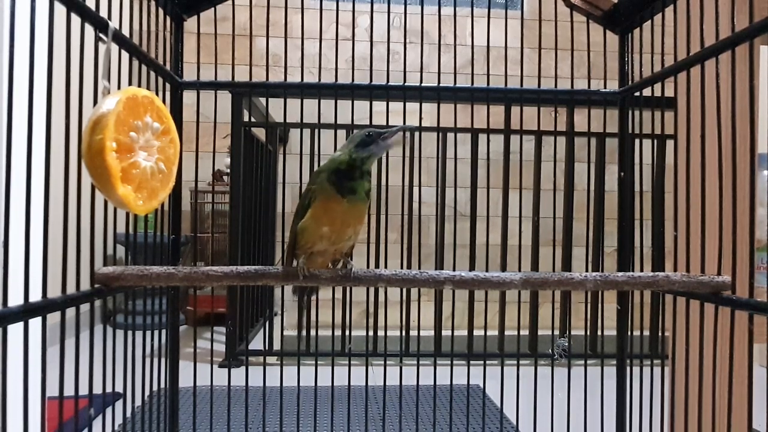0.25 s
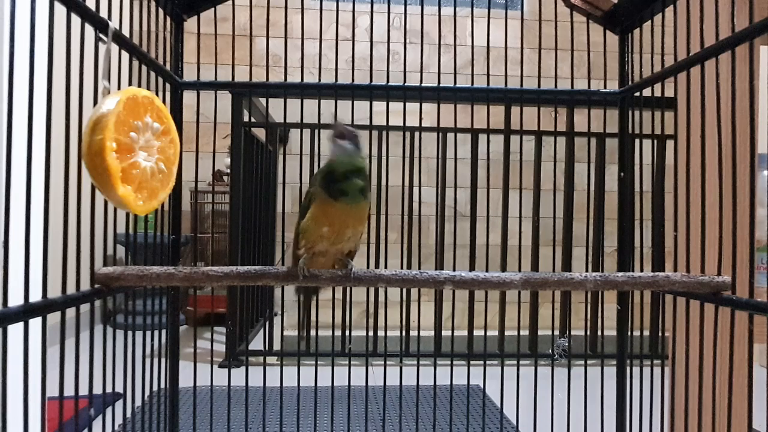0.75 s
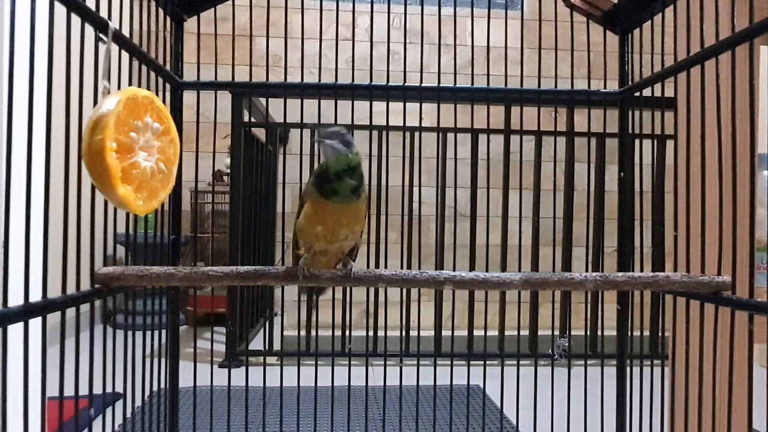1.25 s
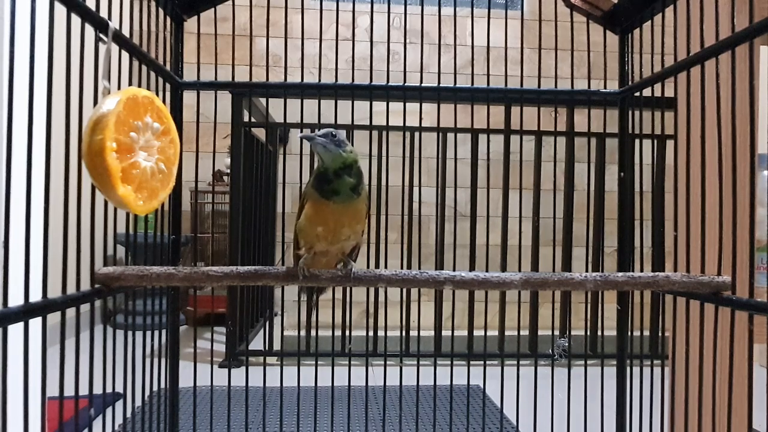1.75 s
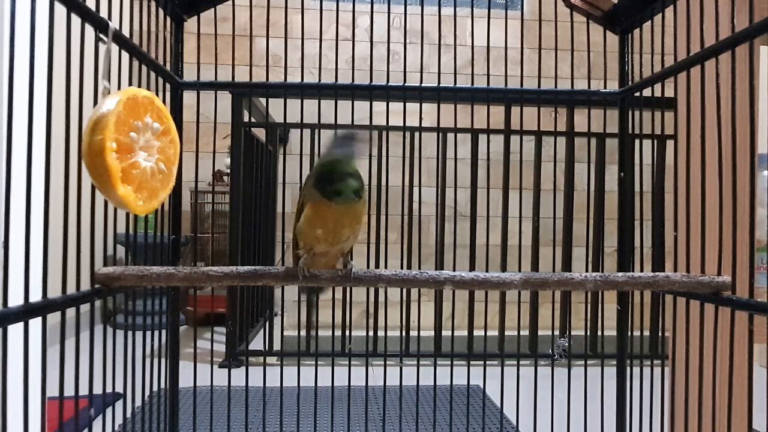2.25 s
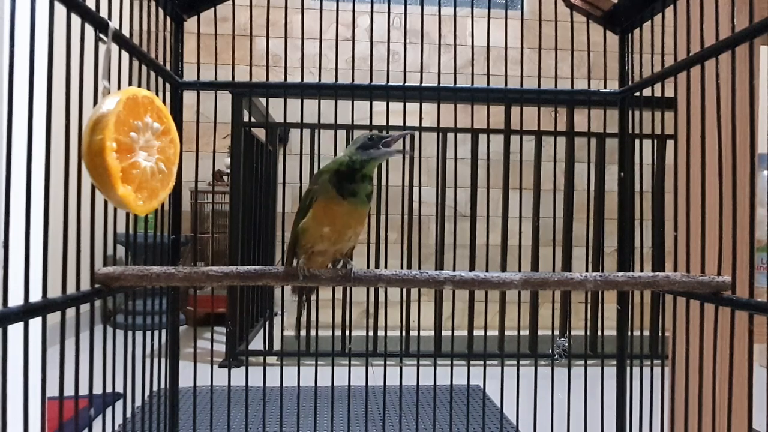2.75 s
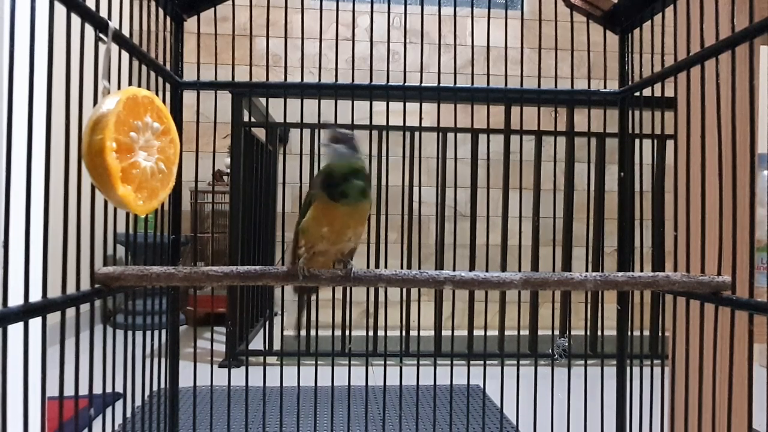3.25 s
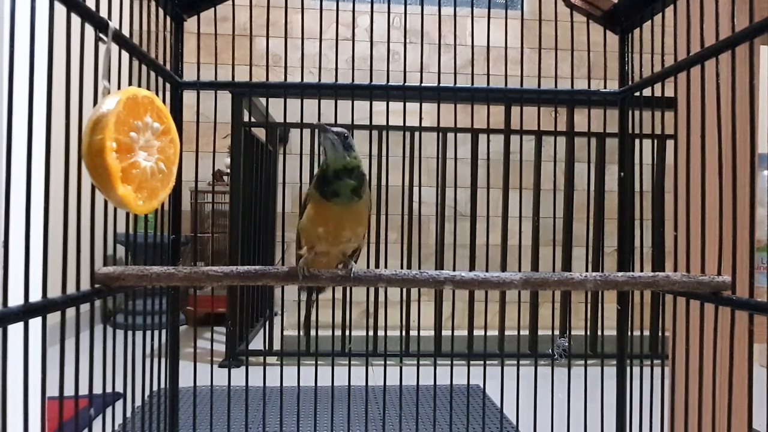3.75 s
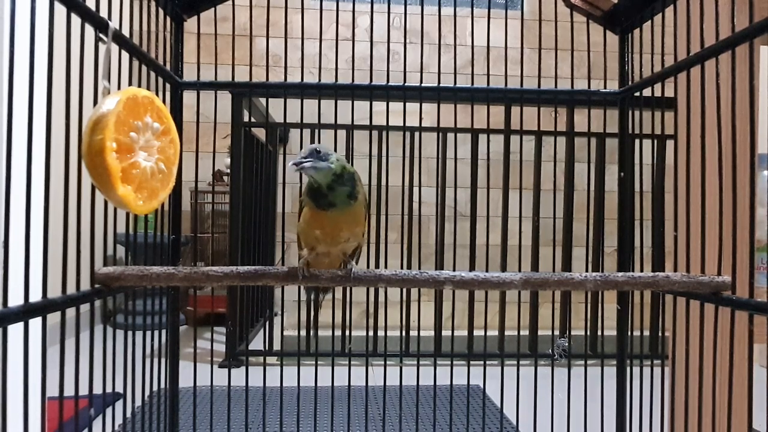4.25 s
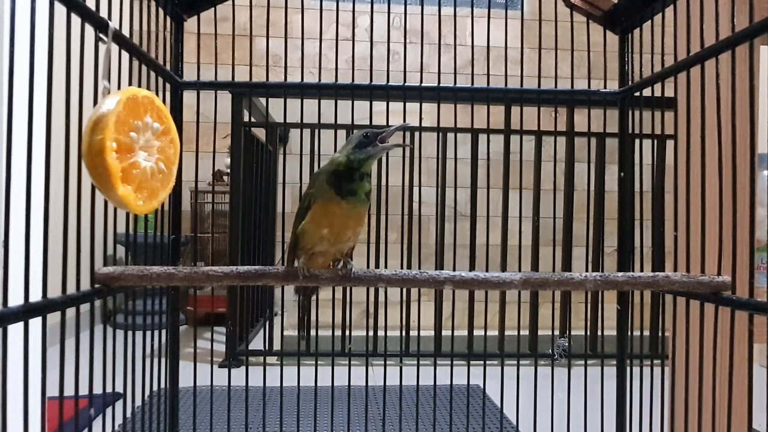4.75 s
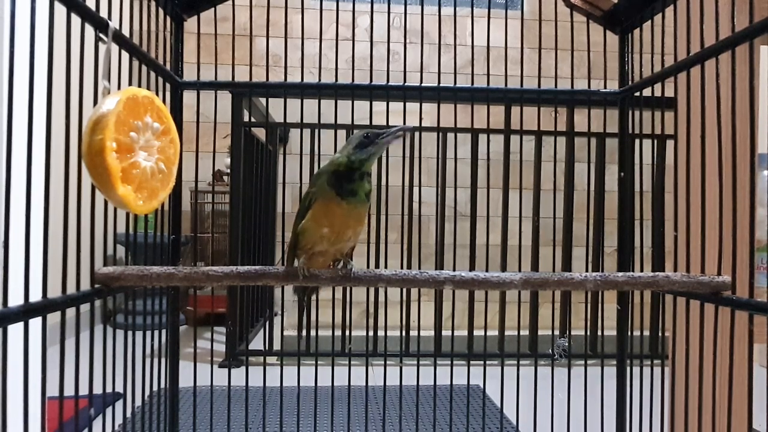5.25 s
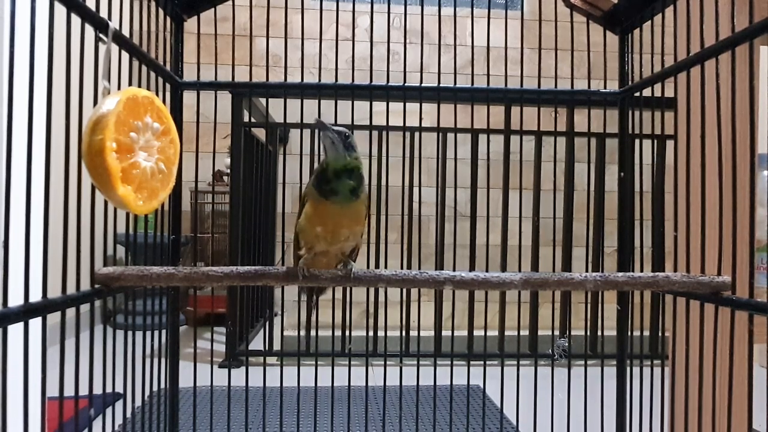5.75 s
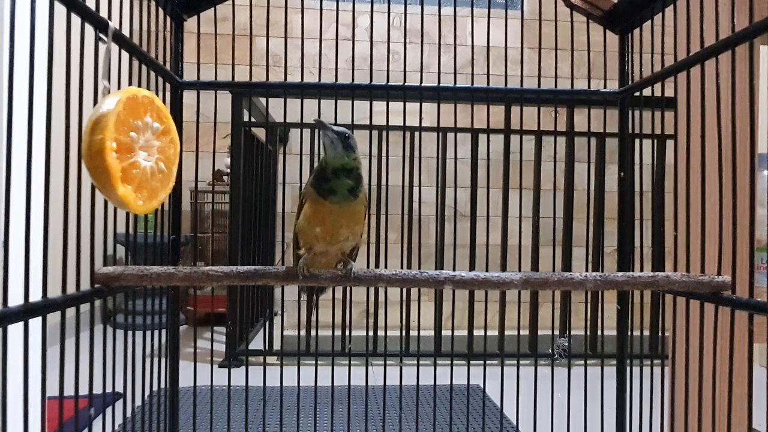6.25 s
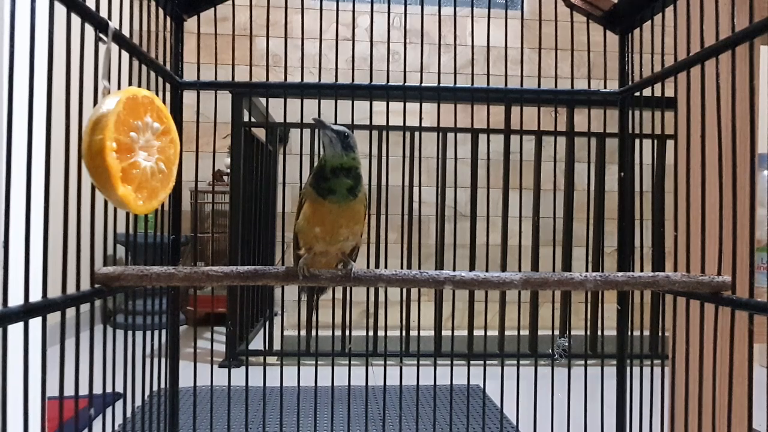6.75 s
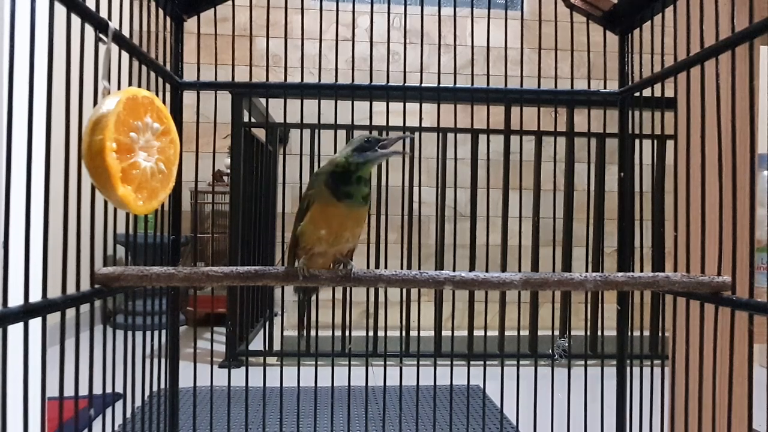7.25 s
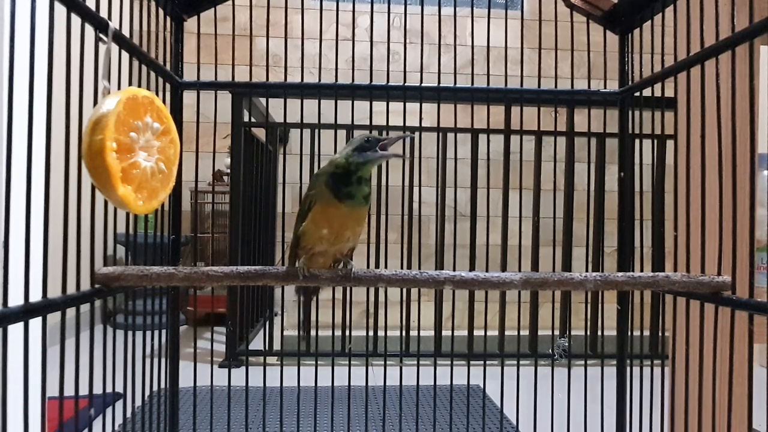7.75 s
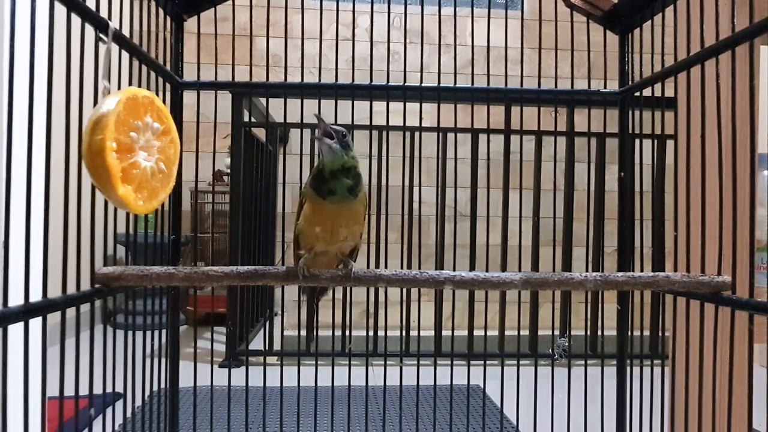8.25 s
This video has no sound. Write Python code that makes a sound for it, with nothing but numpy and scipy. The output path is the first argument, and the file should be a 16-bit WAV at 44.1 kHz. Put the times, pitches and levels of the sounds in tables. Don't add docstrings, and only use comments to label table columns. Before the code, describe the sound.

Close stereo phone pickup of a small bird in a cage, bright and piercing, each note trailing a short ring from nearby walls. Quick raspy chatter repeatedly turns into spaced high whistles. Between bouts, far birds pipe and trill over low engine rumble and town hiss. The last bout is a steady run of harsh chips, still going when it stops.

```python
import sys
import numpy as np
from scipy import signal
from scipy.fft import rfft, irfft
from scipy.io import wavfile
from scipy.ndimage import uniform_filter1d

SR = 44100
rng = np.random.default_rng(int(sys.argv[2]) if len(sys.argv) > 2 else 0)


def decibels_to_gain(level_db):
    exponent = np.asarray(level_db, float) / 20
    return 10 ** exponent


def materialize(psi):
    bounded = np.clip(np.atleast_2d(psi).T, -1, 1)
    quanta = np.round(bounded * 32767).astype(np.int16)
    wavfile.write(sys.argv[1], SR, quanta)


N = 373968
LEAD = 4410
TIME = np.arange(-LEAD, N) / SR

# [f/Hz, share of the left-right level difference]
SHADE = [(500, 0.2), (2400, 0.17), (3300, 0.29), (4600, 1.06), (6000, 1.08), (7200, 0.96), (10000, 0.37),
         (14000, 1.7)]


def on_log(table, hz):
    f, v = np.transpose(table)
    return np.interp(np.log(np.maximum(hz, 1)), np.log(f), v)


def shaped(x, gain):
    n = x.shape[-1]
    return irfft(rfft(x) * gain(np.arange(n // 2 + 1) * SR / n), n)


def walk(n, rate):
    k = int(SR / rate)
    smooth = uniform_filter1d(uniform_filter1d(rng.standard_normal(n), k), k)
    return smooth * np.sqrt(1.84 * k)


def curve(rows, t, off=-120):
    s, *cols = np.transpose(rows)
    return [np.interp(t, s, c) for c in cols[:-1]] + [np.interp(t, s, cols[-1], off, off)]


def add(out, t, note):
    i = LEAD + round(t[0] * SR)
    out[:, i:i + len(t)] += note[:, :out.shape[1] - i]


def shade(x, pan_db):
    return shaped(x, lambda f: decibels_to_gain(np.array([[pan_db], [-pan_db]]) * on_log(SHADE, f) / 2))


def room(x, t60, t60_top, gap_s):
    t = np.arange(SR) / SR
    noise = rng.standard_normal((2, SR))
    dull = shaped(noise, lambda f: 1 / (1 + (f / 7000) ** 6))
    tail = dull * decibels_to_gain(-60 * t / t60) + (noise - dull) * decibels_to_gain(-60 * t / t60_top)
    tail *= 1 - np.exp(-t / gap_s)
    tail /= np.sqrt(np.sum(tail ** 2, axis=1, keepdims=True))
    return signal.fftconvolve(x[None], tail, axes=1)[:, :len(x)]


def syrinx(t, low_hz, high_hz, db, rough, broken_db, coupling, opening_db, breath_db):
    # [t/s, treble from beak gape and aim/dB, lead of the left port/us]
    head = [(0.0, -28, 59), (0.701, 2.5, 41), (0.8, 3, 80), (1.35, -1.5, 94), (2.299, -6.5, 64),
            (2.85, 0.5, 30.5), (3.15, 0, 46), (3.26, 4, 53), (3.5, 0, 100), (4.0, -0.5, 108),
            (4.501, -1.5, 120), (4.57, 2, 52), (5.32, -1.5, 41), (5.4, 1.5, 89), (5.8, 0.5, 113),
            (7.0, -14.5, 58), (7.85, -8.5, 49), (7.92, -6.5, 99)]
    # [f/Hz, level/dB]
    throat = [(860, -30), (1200, -28.5), (1600, -21), (2200, -21.5), (2480, -13), (3200, -8.5), (4000, -2),
              (4700, -3.5), (5700, -1), (6500, -2), (7300, -2), (8400, -18), (9700, -5), (11800, -11.5),
              (14400, -7.5)]
    coupled = [(1, 0), (0, 1), (2, 0), (1, 1), (0, 2), (3, 0), (-1, 2), (2, -1)]
    coupled_db = [1.5, -5.5, 0.5, 4.5, -23, 1.5, -1.5, -6]
    m, n = (k.ravel()[:, None] for k in np.mgrid[-3:13, -1:5])
    scatter, start, turn = rng.standard_normal((3, *m.shape))

    slow = slice(None, None, 10)
    full = lambda v: np.repeat(v.astype(np.float32), 10, axis=-1)
    hz, when = m * low_hz[slow] + n * high_hz[slow], t[slow]

    low = np.cumsum(low_hz * (1 + rough * walk(len(t), 393))) / SR
    high = np.cumsum(high_hz * (1 + rough * walk(len(t), 645))) / SR

    beat = np.maximum(-m, 0) + np.maximum(-n, 0)
    order_db = -4 * abs(m) - 4 * abs(n) - 5 * beat + scatter
    for (a, b), gain_db in zip(coupled, coupled_db):
        order_db += coupling * gain_db * (m == a) * (n == b)
    heard = (hz.max(axis=1) > 400) & (hz.min(axis=1) < 16500)
    m, n, hz, order_db, start, turn = (v[heard] for v in (m, n, hz, order_db, start, turn))

    s, treble_db, lead_us = np.transpose(head)
    pan_db = np.interp(lead_us, [45, 100], [-7, -3.5])
    gape_db = np.interp(when, s, treble_db) * np.clip(hz / 8000, 0, 1) ** 3
    gape_db += opening_db[slow] * np.log2(np.clip(hz, 500, 7000) / 4500)

    held = np.repeat(rng.standard_normal((len(m), len(when) // 10 + 1)), 10, axis=1)
    flicker = uniform_filter1d(held, size=10)[:, :len(when)]
    flicker_db = broken_db * flicker * np.clip(hz / 5000, .55, 3)
    size = decibels_to_gain(order_db + on_log(throat, hz) + gape_db + flicker_db) * (hz > 300) * (hz < 17000)
    size *= np.sqrt(2 / np.sum(size ** 2, axis=0))

    side = decibels_to_gain(np.interp(when, s, pan_db) * on_log(SHADE, hz) / 2)
    phase = (2 * np.pi * (m * low + n * high + start)).astype(np.float32)
    lead_cycles = np.minimum(hz, 11000) * np.interp(when, s, lead_us) / 1012000.0
    lead = full(2 * np.pi * lead_cycles + 0.66 * turn * hz / 8000)
    left = np.sum(full(size * side) * np.sin(phase + lead), axis=0)
    right = np.sum(full(size / side) * np.sin(phase), axis=0)
    tones = np.array([left, right]) * decibels_to_gain(db + 0.57 * walk(len(t), 100))

    breath_colour = lambda f: decibels_to_gain(on_log(throat, f)) * np.minimum(f / 4300, 1) ** 8.5
    air = shaped(rng.standard_normal((2, len(t))), breath_colour)
    return tones + shade(air / air.std(), np.interp(t[0], s, pan_db)) * decibels_to_gain(db + breath_db)


def whistle(s, length, low_hz, high_hz, db, slack, tighten_s, opening_db=-1.5):
    t = s - .014 + np.arange(7800) / SR
    age = t - s
    u = np.clip(age / length, 0, 1)
    tight = 1 - slack * np.exp(-np.maximum(age, 0) / tighten_s)
    tight -= 6 * slack * (slack < .2) * np.clip((.002 - age) / .014, 0, 1)
    tight -= 0.0289 * np.exp(np.minimum(age - length, 0) / 0.0153)

    rest_low_hz, rest_high_hz, sag_power = 2162, 3073, 2.3
    low = tight * (low_hz - (low_hz - rest_low_hz) * u ** sag_power)
    high = tight * (high_hz - (high_hz - rest_high_hz) * u ** sag_power)

    attack_db = -9 * np.clip(1 - age / 0.01, 0, 1) + 900 * np.minimum(age, 0)
    swell_db = -0.5 * (2 * u - 1) ** 2
    release_db = -16.5 * np.clip(1 + (age - length) / 0.019, 0, 1) - 1400 * np.maximum(age - length, 0)
    effort_db = db + attack_db + swell_db + release_db - 2
    return t, syrinx(t, low, high, effort_db, rough=0.0047, broken_db=2.0, coupling=0.84,
                     opening_db=opening_db + 0 * t, breath_db=-8)


def chip(s, length, db, from_hz, to_hz, flick, late, rough, opening_db):
    t = s - .01 + np.arange(2800) / SR
    u = (t - s) / length
    hz0, hz1 = np.array([from_hz, to_hz]) * (1 + .07 * rng.standard_normal(2))
    bend = 1 + flick * (np.clip(u, 0, 1.1) ** 4 - np.clip(u, 0, 1) / 2)
    low = hz0 * (hz1 / hz0) ** np.clip(u, -.4, 1.1) * bend
    effort_db = db - 4 - 14 * np.maximum(late - u, 0) - 50 * np.maximum(.06 - u, 0)
    effort_db -= 60 * np.maximum(u - .9, 0) + 130 * np.maximum(u - 1.1, 0)
    return t, syrinx(t, low, 1.48 * low, effort_db, rough, broken_db=4.5, coupling=0.033,
                     opening_db=opening_db * np.clip(u, 0, 1), breath_db=-3)


def songbird():
    # [t/s, length/s, top of low voice f/Hz, top of high voice f/Hz, level/dB]
    opening = [
        (-0.08, .13, 2328, 3308, -20),
        (0.04, .09, 2337, 3310, -28),
    ]
    # [t/s, length/s, top of low voice f/Hz, top of high voice f/Hz, level/dB]
    whistles = [(0.795, 0.11, 2360, 3174, -15), (0.985, 0.14, 2457, 3288, -16.5),
                (1.192, 0.16, 2591, 3833, -20.5), (2.817, 0.12, 2372, 3179, -16.5),
                (3.01, 0.14, 2590, 3473, -17), (3.255, 0.15, 2570, 3535, -17),
                (3.495, 0.14, 2454, 3412, -19), (4.394, 0.096, 2308, 3230, -16.5),
                (4.582, 0.12, 2414, 3250, -16), (4.782, 0.14, 2507, 3398, -17),
                (5.166, 0.14, 2559, 3480, -17.5), (5.411, 0.14, 2525, 3405, -17),
                (5.65, 0.11, 2466, 3326, -16)]
    # [t/s, length/s, low f/Hz, high f/Hz, level/dB]
    scoops = [
        (0.578, 0.13, 2257, 3133, -18.5),
        (2.56, 0.13, 2305, 3194, -16.5),
        (4.236, 0.061, 2236, 3080, -19),
    ]
    # [t/s, length/s, level/dB]
    chatter = [(0.341, 0.033, -17), (0.396, 0.028, -14), (0.451, 0.031, -16), (0.512, 0.03, -15.5),
               (2.319, 0.03, -15), (2.372, 0.032, -14), (2.432, 0.029, -13), (2.499, 0.026, -12.5),
               (3.994, 0.027, -15), (4.047, 0.025, -14), (4.102, 0.026, -14.5), (4.17, 0.021, -14.5)]
    # [t/s, length/s, level/dB]
    rattle = [(7.07, 0.031, -14), (7.131, 0.034, -14.5), (7.202, 0.031, -14), (7.271, 0.037, -15),
              (7.353, 0.027, -13.5), (7.436, 0.026, -13), (7.503, 0.033, -15), (7.587, 0.028, -14.5),
              (7.662, 0.028, -14.5), (7.73, 0.038, -15.5), (7.808, 0.036, -15), (7.906, 0.023, -13.5),
              (7.978, 0.025, -12.5), (8.06, 0.023, -13), (8.139, 0.026, -13), (8.219, 0.024, -11),
              (8.308, 0.024, -12), (8.387, 0.022, -12.5), (8.47, 0.029, -10)]
    out = np.zeros((2, len(TIME)))
    for row in whistles:
        add(out, *whistle(*row, slack=.09, tighten_s=.015))
    for row in opening:
        add(out, *whistle(*row, slack=.03, tighten_s=0.0303, opening_db=-0.5))
    for row in scoops:
        add(out, *whistle(*row, slack=.45, tighten_s=.016))
    for row in chatter:
        add(out, *chip(*row, from_hz=1190, to_hz=2080, flick=0.082, late=0.54, rough=.023, opening_db=0.5))
    for k, row in enumerate(rattle):
        rough = .023 + .0008 * min(k, 14)
        late = .4 if k < 4 else .65
        add(out, *chip(*row, from_hz=1110, to_hz=2510, flick=0.3474, late=late, rough=rough, opening_db=9.5))
    return out


def drone(rows, wander, off=-120):
    hz, db = curve(rows, TIME, off)
    turn = np.exp(2j * np.pi * np.cumsum(hz) / SR)
    return decibels_to_gain(db) * np.real(turn * (walk(len(TIME), wander) + 1j * walk(len(TIME), wander)))


def background():
    # [t/s, f/Hz, level/dB]
    traffic = [(0.0, 74.3, -57), (0.4, 87, -66), (0.6, 71, -58), (2.3, 73.6, -61.5), (2.74, 72, -62),
               (2.9, 96.4, -55), (3.35, 94.7, -46), (3.8, 86.9, -50.5), (4.5, 99.8, -66), (4.95, 86, -56.5),
               (5.2, 65.8, -62), (6.1, 69.25, -55), (6.5, 90.1, -54.5), (6.97, 75.4, -48),
               (7.18, 77, -56.5), (7.68, 89, -48), (8.15, 85.2, -51), (8.48, 84.7, -57)]
    # [t/s, f/Hz, level/dB]
    hum = [
        (0, 151, -70.5),
        (.6, 145, -84),
        (1.8, 146, -62),
        (2.6, 134, -79),
        (3.4, 114.8, -62),
        (4.6, 115.4, -68.5),
        (6.1, 118.6, -60.5),
        (7.6, 118, -58.5),
        (8.48, 126.4, -68),
    ]
    # [t/s, f/Hz, level/dB]
    dove = [
        (6.1, 484, -74),
        (6.2, 470, -56),
        (6.3, 532, -57),
        (6.39, 560, -59),
        (6.45, 552, -95),
        (6.8, 608, -86),
        (6.9, 623, -57),
        (7.0, 597, -74),
    ]
    # [f/Hz, level per Hz/dB]
    yard = [(25, -10), (80, -19), (140, 1), (264, -11), (632, -8), (800, -10), (1770, -14), (3400, -13.5),
            (4900, -17), (8150, -25.5), (16000, -26.5)]
    mid, side, deep, deep_side = rng.standard_normal((4, len(TIME)))
    sign = np.array([[1], [-1]])
    colour = lambda f: decibels_to_gain(on_log(yard, f))
    hiss = shaped(mid, colour) + sign * shaped(side, lambda f: colour(f) * np.clip(f / 1300, .3, 1))
    hiss = hiss / hiss.std() * decibels_to_gain(-52.5 + 0.96 * walk(len(TIME), 10.6))

    rumble_band = lambda f: 1 / (1 + (58 / np.maximum(f, 1)) ** 5) / (1 + (f / 105) ** 5)
    rumble = shaped(deep + 0.41 * sign * deep_side, rumble_band)
    tones = decibels_to_gain(-2.5) * drone(traffic, 6.7, off=-60) + drone(hum, 5.3) + decibels_to_gain(-0.5) * drone(dove, 170)
    traffic_db = curve(traffic, TIME, off=-60)[1]
    low = rumble / rumble.std() * decibels_to_gain(-2 + traffic_db) + tones
    return hiss + low * decibels_to_gain(-.7 * sign)


def far_birds():
    # [t/s, level/dB]
    pipes = [
        (1.534, -55),
        (1.638, -55.5),
        (1.742, -59),
        (1.836, -59),
        (1.932, -59),
        (2.04, -62),
        (2.142, -57),
        (2.24, -58),
    ]
    # [t/s, level/dB]
    trills = [
        (5.6, -64),
        (5.95, -54),
        (6.3, -53),
        (6.65, -55.5),
        (6.85, -56),
        (7.0, -61),
        (7.3, -71),
    ]
    pipe_db = [top_db + np.minimum(896.5 * (TIME - s), 190 * (s - TIME)) for s, top_db in pipes]
    db = np.max(pipe_db, axis=0)
    beads_db = 5 * np.sin(2 * np.pi * 26 * (TIME - 1.83)) + 3 * walk(len(TIME), 50)
    pipe_hz = 4060 + 55 * walk(len(TIME), 33.8)
    piper = decibels_to_gain(db + 8.5 + beads_db) * np.sin(2 * np.pi * np.cumsum(pipe_hz) / SR)

    beat = (TIME - 6.27) * 9.9 % 1
    sweep_hz = np.interp(beat, [0, .3, .36, .62, .68, .95, 1], [3850, 4550, 3250, 4300, 3300, 4200, 3850])
    swell_db = np.interp(beat, [0, .1, .3, .4, .95, 1], [-4, 3, 2, 1, 0, -4])
    trill_db = curve(trills, TIME)[0] + swell_db + 3.6 * walk(len(TIME), 76.7)
    trill = decibels_to_gain(trill_db) * np.sin(2 * np.pi * np.cumsum(sweep_hz) / SR)
    blurred = decibels_to_gain(-7) * trill + room(trill, .45, .45, .004)
    return decibels_to_gain(-0.5) * piper + decibels_to_gain(-3.5) * room(piper, 0.68, 0.28, 0.014) + decibels_to_gain(5.5) * blurred


def puffs():
    # [t/s, peak level/dB]
    gusts = [
        (7.583, -45),
        (7.998, -38),
        (8.075, -37),
        (8.153, -36),
        (8.237, -40),
        (8.31, -48),
        (8.402, -40.5),
    ]
    out, t = np.zeros(len(TIME)), np.arange(600) / SR
    fall_hz = 250 + 900 * np.exp(-t / 0.0014)
    thump = np.sin(2 * np.pi * np.cumsum(fall_hz) / SR) * t / 0.0036 * np.exp(-t / 0.0026)
    for s, db in gusts:
        i = LEAD + int(s * SR)
        out[i:i + 600] += decibels_to_gain(db + 4.0) * thump
    return out


def scene():
    bird = songbird()
    near = decibels_to_gain(-7) * room(bird[0], 0.14, 0.063, 0.00067)
    thin = shaped(bird[0], lambda f: np.minimum(f / 4000, 1) ** .6)
    yard = decibels_to_gain(-9.5) * room(thin, 0.9, 0.56, 0.0077)
    walls = shade(near + yard, -4.5)
    return (bird + walls + puffs() + shade(far_birds(), -7.0) + background())[:, LEAD:]


def top_cut(x):
    return signal.sosfilt(signal.butter(12, 16260, fs=SR, output="sos"), x)


def record(dry):
    ring = signal.lfilter(*signal.iirpeak(6000, 14, fs=SR), dry)
    top = signal.ellip(14, .1, 95, 15950, fs=SR, output="sos")
    heard = signal.sosfilt(top, dry + decibels_to_gain(-3.5) * ring)
    heard = .85 * np.tanh(heard / .85)
    return top_cut(heard)


dry = scene()
out = record(dry)
materialize(out)
```